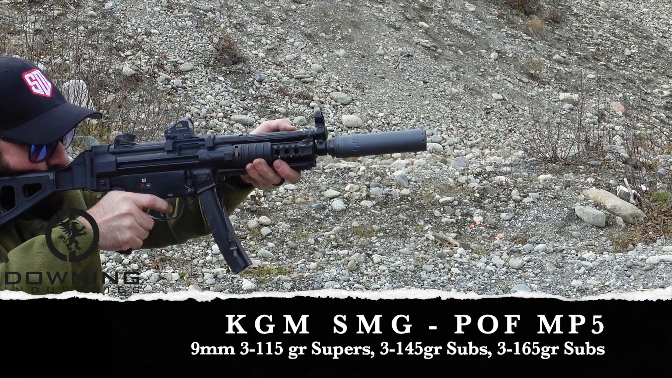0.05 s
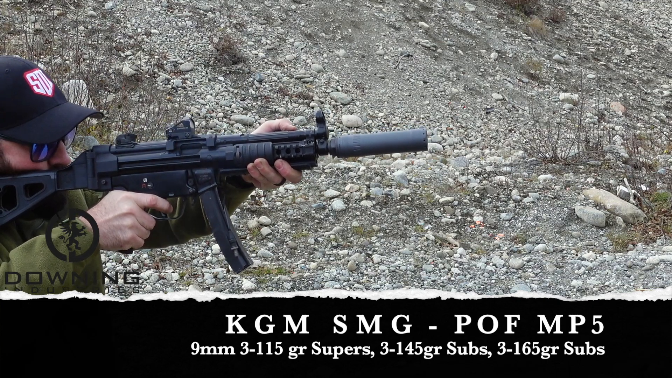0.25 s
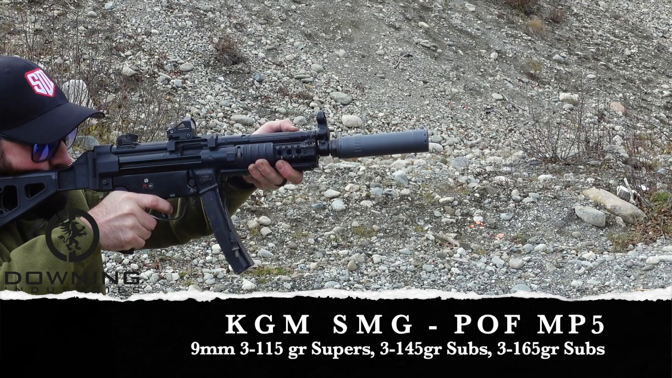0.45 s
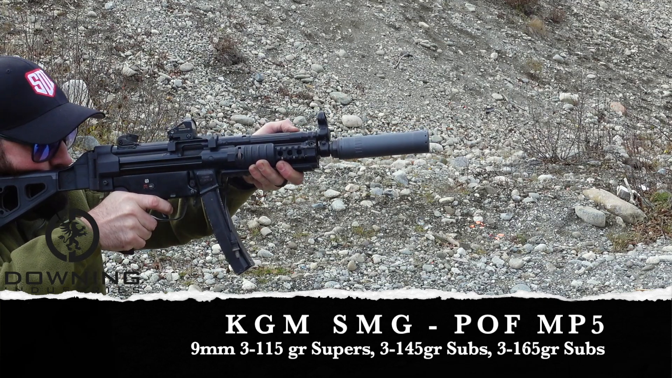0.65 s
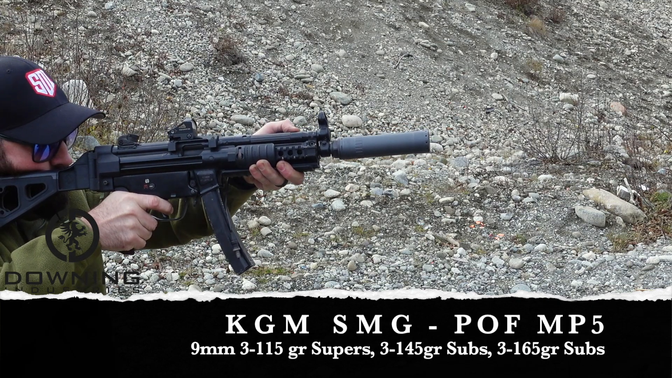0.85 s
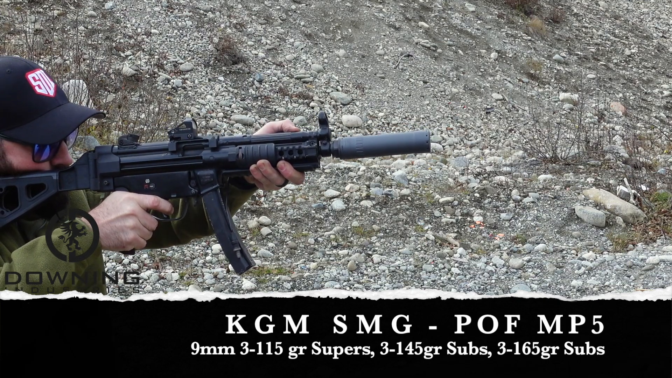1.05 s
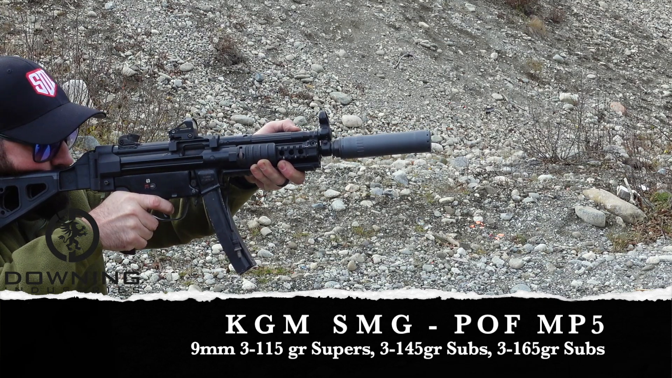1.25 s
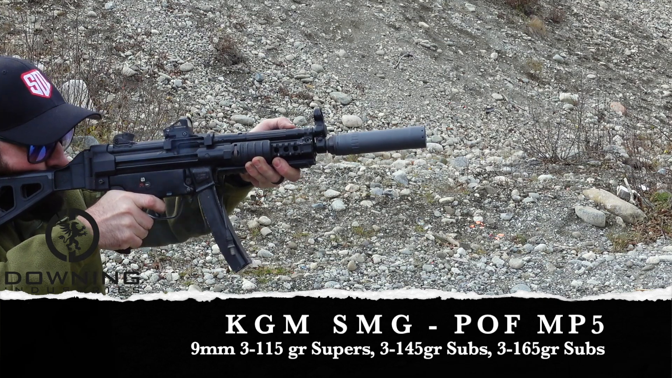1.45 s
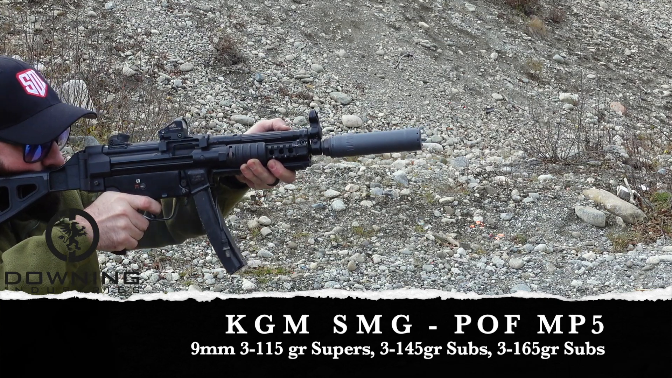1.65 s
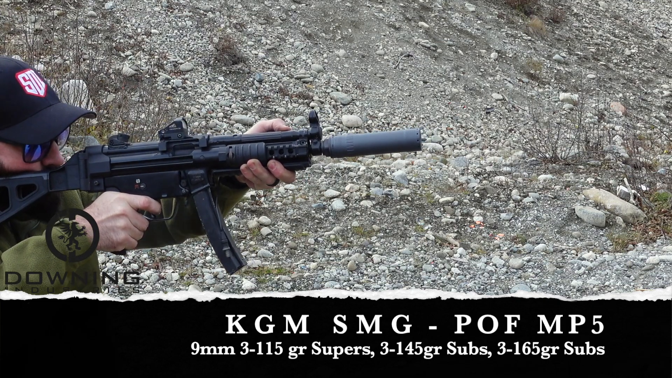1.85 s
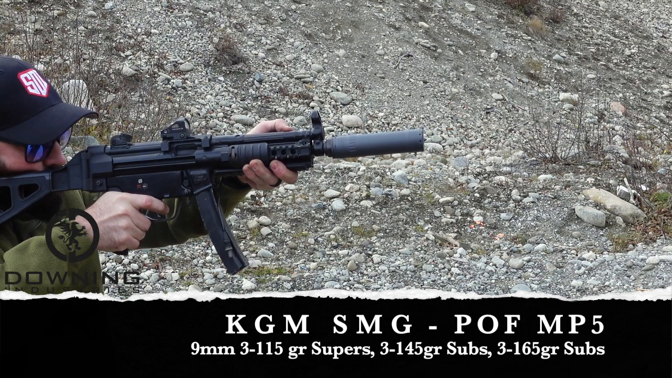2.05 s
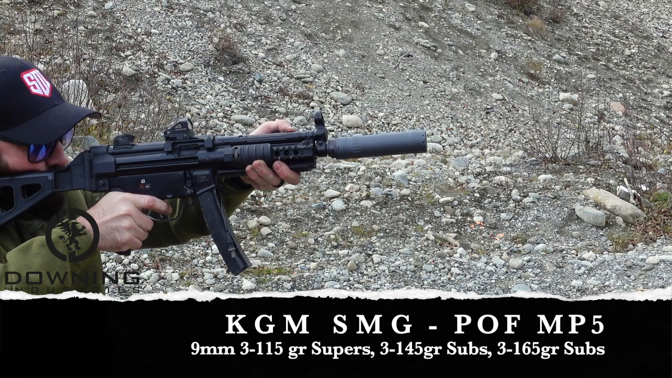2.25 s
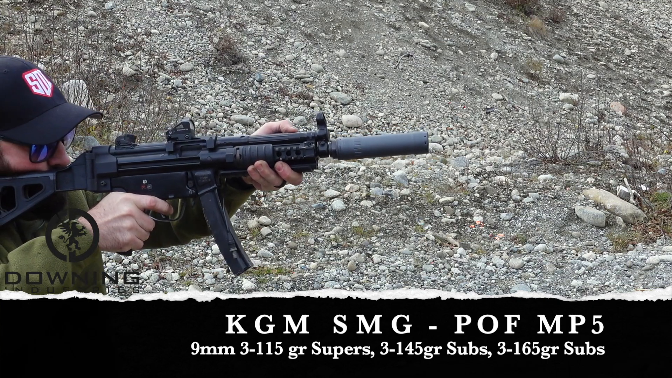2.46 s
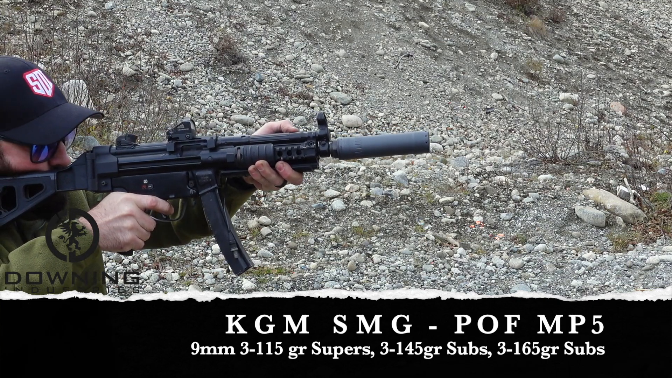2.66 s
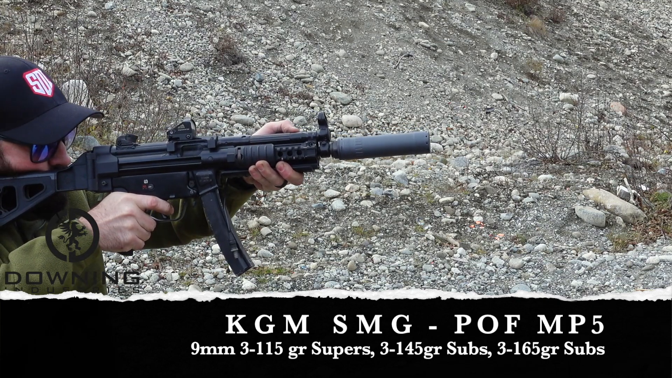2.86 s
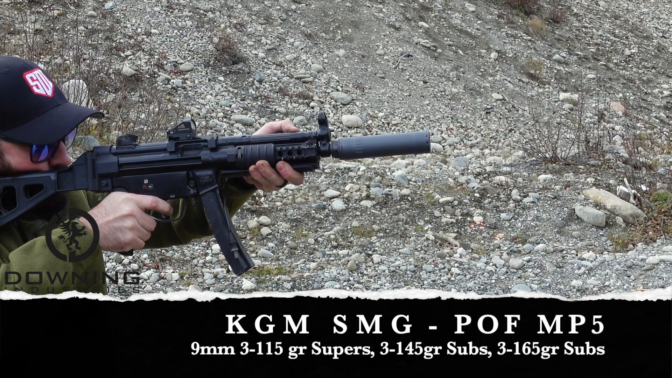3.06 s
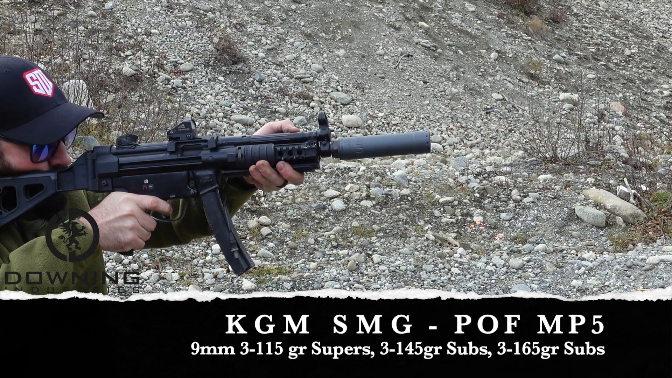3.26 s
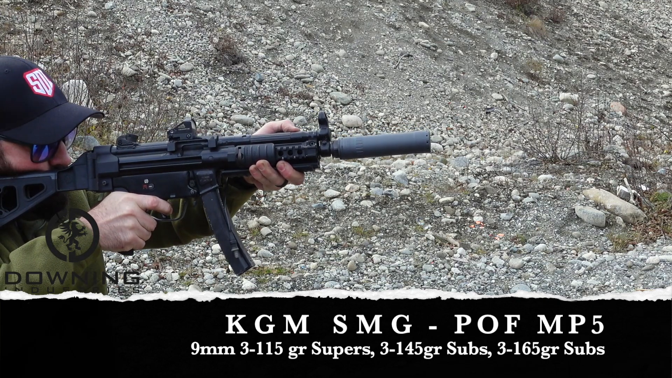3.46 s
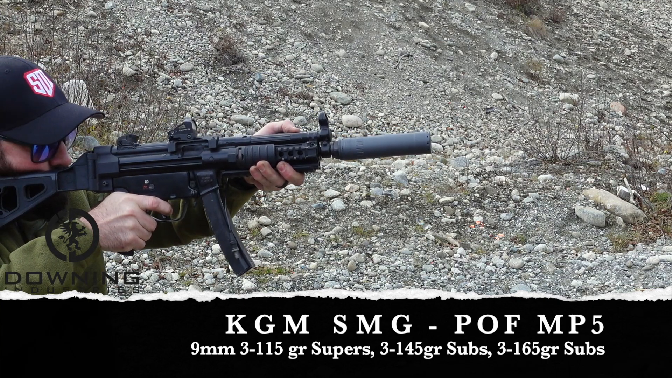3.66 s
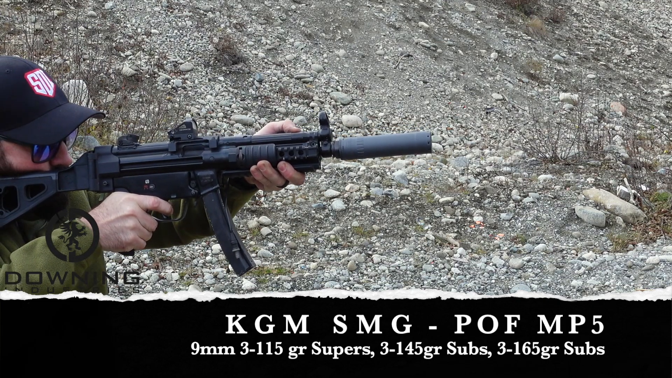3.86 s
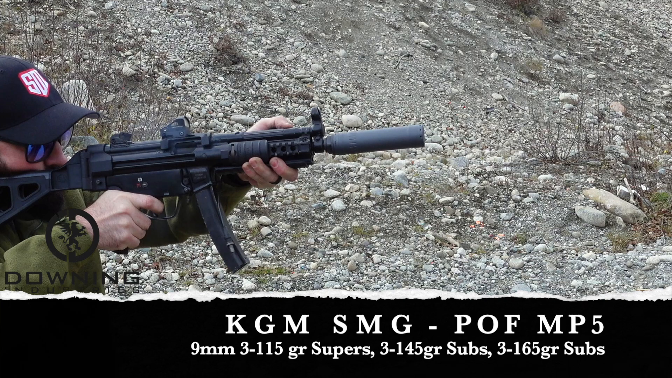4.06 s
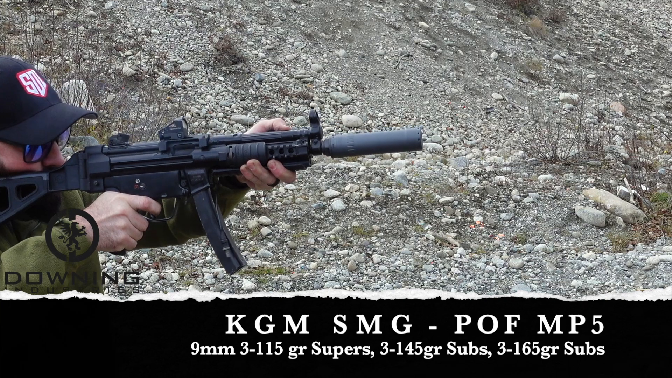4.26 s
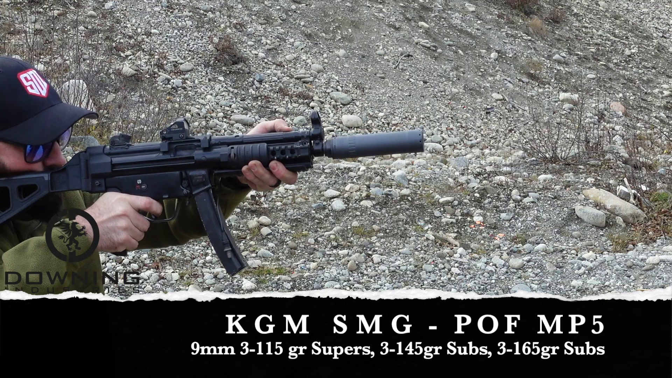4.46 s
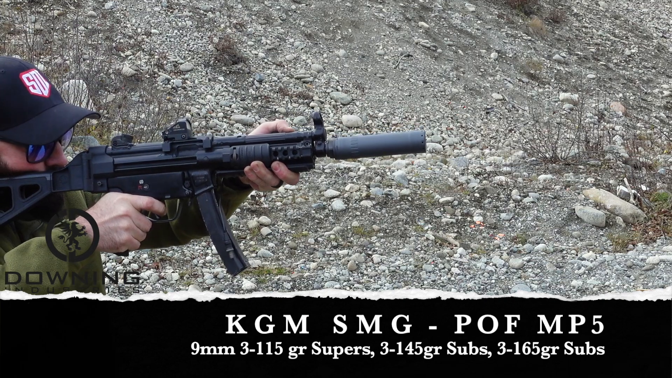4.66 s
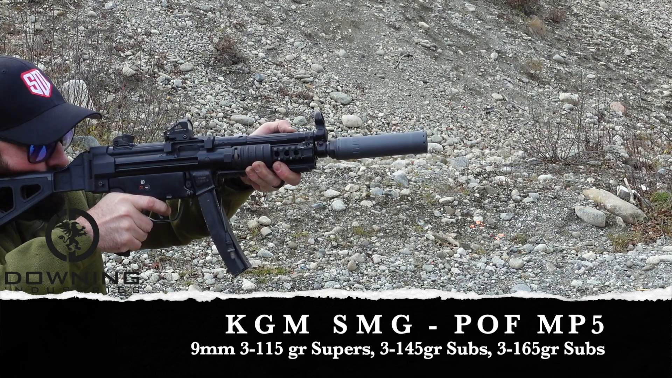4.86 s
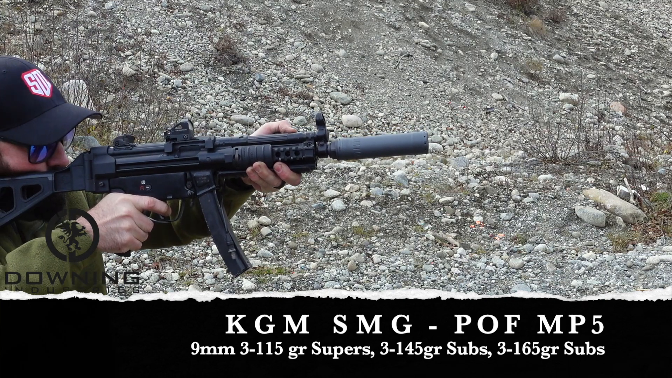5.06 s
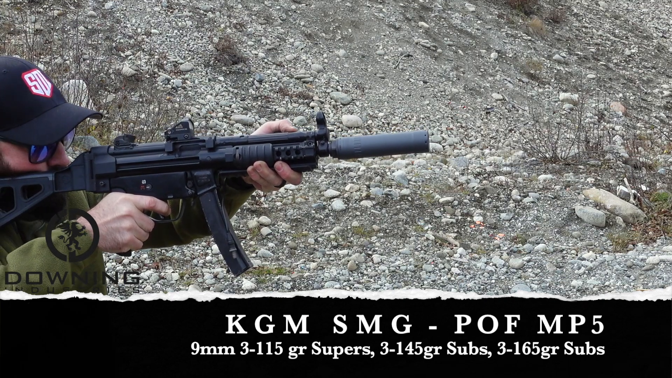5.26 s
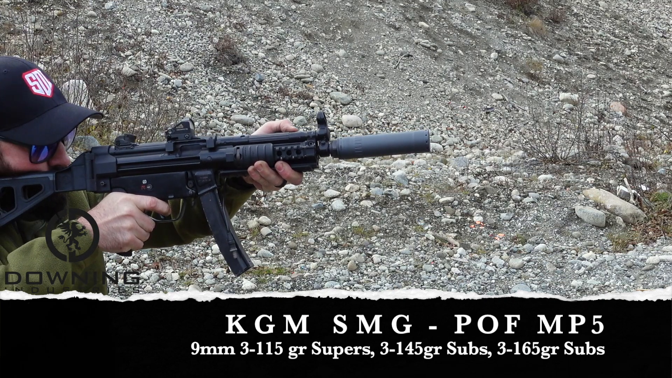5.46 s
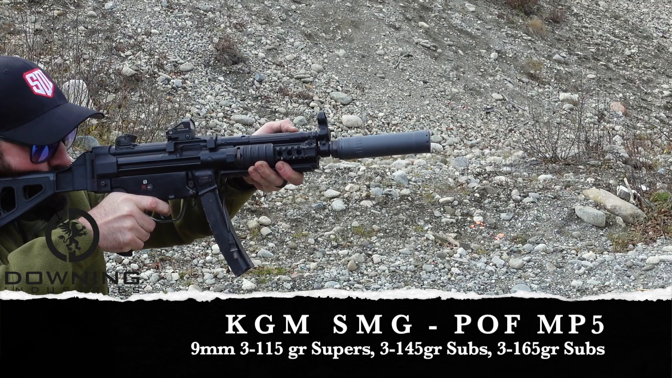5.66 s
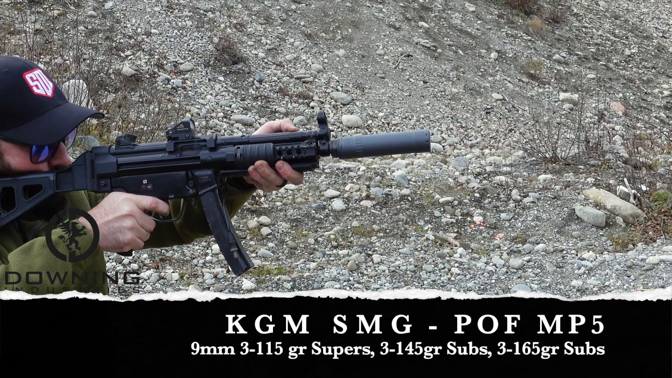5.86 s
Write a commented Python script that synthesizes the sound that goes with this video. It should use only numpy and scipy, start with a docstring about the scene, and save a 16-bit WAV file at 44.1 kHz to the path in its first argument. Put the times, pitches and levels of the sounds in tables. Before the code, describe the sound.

Two separate single shots from a suppressed gun heard close up in one channel. Each is a dry, punchy burst of gas with fast steel bolt slaps, then echoes off gravel slopes and a crisp trigger reset click. The first is brighter and longer, with hissing crack scatter and a strong thud from the bank; the second is drier. Soft breeze, tiny metal ticks and stock knocks fill the gaps.

```python
"""Suppressed carbine at a gravel range

Two single shots from a 9 mm carbine outdoors, heard from beside the gun, in steady air noise and breeze.
Each shot: hammer fall, gas jet and roar, pressure swing, venting, bolt contacts, thuds in the bank, echoes.
Supersonic cracks (one from before the opening, one with the first shot) add washes; gravel throws sprays.
Contacts and gas are shaped noise bursts, steel is ringing modes, echoes are noise in decaying bands.
The trigger resets with a click after each shot; blast and bolt overload the input and its limiter."""
import sys
import numpy as np
from scipy import signal
from scipy.fft import rfft, irfft
from scipy.io import wavfile

SR = 44100
rng = np.random.default_rng(int(sys.argv[2]) if len(sys.argv) > 2 else 0)


def waveform_to_disk(signal):
    """Save audio, clipped to [-1, 1], as 16-bit WAV at the path in sys.argv[1]."""
    frames = np.transpose(np.atleast_2d(signal))
    scaled = np.clip(frames, -1, 1) * 32767
    samples = np.round(scaled).astype(np.int16)
    wavfile.write(sys.argv[1], SR, samples)


N = 260631
TIME = np.arange(N) / SR


def from_db(db):
    """Decibels to amplitude gain."""
    return 10 ** (np.asarray(db) / 20)


def at_hz(points, hz):
    """Interpolate a spectrum linearly in dB along log frequency."""
    knots_hz, values = np.transpose(points)
    return np.interp(np.log(np.maximum(hz, 1)), np.log(knots_hz), values)


def colour(x, spectrum):
    """Minimum-phase filter with this relative spectrum; white noise keeps its power."""
    size = 8192
    hz = np.arange(size // 2 + 1) * SR / size
    gain = from_db(at_hz(spectrum, hz))
    unit_power_gain = gain / np.sqrt(np.mean(gain ** 2))
    # fold the cepstrum onto positive time: causal response
    cepstrum = irfft(np.log(unit_power_gain))
    cepstrum[1:size // 2] *= 2
    cepstrum[size // 2 + 1:] = 0
    impulse = irfft(np.exp(rfft(cepstrum)))
    return signal.oaconvolve(x, impulse)[:N]


def band_pass(x, low_hz, high_hz):
    """Butterworth band-pass, second order at each edge."""
    edges_hz = [low_hz, min(high_hz, .45 * SR)]
    sos = signal.butter(2, edges_hz, "band", fs=SR, output="sos")
    return signal.sosfilt(sos, x + 1e-18)


def bursts(rows, rise_s):
    """White noise that flares up and decays exponentially at each row (start_s, level_db, t60_s)."""
    power = np.zeros(N)
    for start_s, level_db, t60_s in rows:
        at = round(start_s * SR)
        age_s = TIME[:min(N - at, SR // 2)]
        decay = from_db(level_db - 60 * age_s / t60_s)
        rise = 1 - np.exp(-age_s / rise_s)
        power[at:at + len(age_s)] += (decay * rise) ** 2
    return np.sqrt(power) * rng.standard_normal(N)


def ring(force, hz, t60_s):
    """Two-pole resonator: a unit click starts a decaying sine of initial height 1."""
    radius = from_db(-60 / (t60_s * SR))
    step_rad = 2 * np.pi * hz / SR
    feedback = [1, -2 * radius * np.cos(step_rad), radius ** 2]
    return signal.lfilter([0, np.sin(step_rad)], feedback, force + 1e-18)


# distant outdoor noise, relative: pitch [Hz], level [dB per Hz]
AIR_SPECTRUM = [(12, -27.5), (20, 3), (58, -12.5), (130, -12.5), (241, -15.5), (293, -12), (590, -14),
                (780, -17), (1530, -20.5), (3250, -31), (5680, -36.5), (14300, -40), (16000, -42)]
# breeze gusts: peak [s], rise above calm [dB]
GUST_ROWS = [(2.58, 7.5), (2.95, 6), (3.55, 5), (5.72, 9)]
AIR_RMS_DB, CALM_RMS_DB = -63.5, -77.5
GUST_HALF_S = .14  # from peak to 1/e of the dB rise


def outdoor_air(flutter_db=1.55):
    """Steady coloured noise, plus low-frequency noise swelling as wind turbulence on the microphone."""
    knots_s = np.arange(0, 6.2, .12)
    flutter = np.interp(TIME, knots_s, rng.standard_normal(len(knots_s)))
    gust_db = sum(rise_db * np.exp(-((TIME - peak_s) / GUST_HALF_S) ** 2) for peak_s, rise_db in GUST_ROWS)
    wind_gain = from_db(CALM_RMS_DB + gust_db + flutter_db * flutter)
    wind = band_pass(rng.standard_normal(N), 30, 120)
    air = colour(rng.standard_normal(N), AIR_SPECTRUM)
    return from_db(AIR_RMS_DB) * air + wind_gain * wind / wind.std()


def returned_db(delay_s, reflectors):
    """Each stretch of terrain swells up to its own delay, then fades at a steady dB rate; powers sum."""
    power = 1e-18
    for arrives_s, swell_s, level_db, fade_db_per_s in reflectors:
        swell = np.exp(-(np.minimum(delay_s - arrives_s, 0) / swell_s) ** 2)
        fade = from_db(level_db - fade_db_per_s * np.maximum(delay_s - arrives_s, 0))
        power = power + (swell * fade) ** 2
    return 10 * np.log10(power)


# soft ground eats the lows, air the highs: pitch [Hz], loss [dB per s of travel]
LOSS_SPECTRUM = [(50, 39.5), (140, 53.5), (280, 44), (560, 20), (1100, 3), (2200, 12.5), (4000, 27),
                 (6300, 44), (8000, 55.5), (10000, 75), (12000, 93.5), (14000, 104)]


def echoes(sources, reflectors, spectrum, longest_s, grain_db):
    """Countless small reflections as band noise: later ones lose more lows and highs, up to a limit."""
    edges_hz = np.geomspace(35, 17000, 33)
    white = rng.standard_normal((2, N))
    # stronger and weaker reflectors by turns, a few ms apart
    grain_s = TIME[::128]
    grain = from_db(grain_db * np.interp(TIME, grain_s, rng.standard_normal(len(grain_s))))
    coarse_s = TIME[::32]
    out = np.zeros(N)
    for k, (low_hz, high_hz) in enumerate(zip(edges_hz, edges_hz[1:])):
        hz = np.sqrt(low_hz * high_hz)
        octaves = np.log2(high_hz / low_hz)
        power = 0
        for start_s, source_db in sources:
            delay_s = np.maximum(coarse_s - start_s, 0)
            travel_s = longest_s * np.tanh(delay_s / longest_s)  # saturates at longest_s
            loss_db = at_hz(LOSS_SPECTRUM, hz) * travel_s
            level_db = source_db + returned_db(delay_s, reflectors) + at_hz(spectrum, hz) - loss_db
            power = power + (coarse_s > start_s) * from_db(level_db) ** 2 * octaves
        sos = signal.butter(3, [low_hz, high_hz], "band", fs=SR, output="sos")
        band = signal.sosfilt(sos, white[k % 2] * grain)
        out += band / band.std() * np.interp(TIME, coarse_s, np.sqrt(power))
    return out


# supersonic bullets, the first before the opening: start [s], echo level [dB]
CRACK_ROWS = [(-.53, 1.5), (1.3862, -1)]
# crack echo colour: pitch [Hz], level [dB per octave]
CRACK_SPECTRUM = [(50, -30), (140, -18), (280, -3.5), (560, -1), (1100, 1), (1800, 6.5), (2500, 2.5),
                  (3600, 10), (4800, 6), (6300, 7.5), (10000, 4), (14000, 2.5)]
# nearby gravel, bank, hillside, far country:
# delay [s], swell [s], blast level [dB], blast fade [dB/s], crack level [dB], crack fade [dB/s]
TERRAIN_ROWS = [(.02, .013, -41.5, 44, -32.5, 70), (.15, 0.038, -44, 52, -31, 37),
                (.54, .22, -49, 55, -39, 61), (.95, 0.34, -85.5, 30, -59.5, 12.5)]


def crack_wash():
    """Terrain returns the supersonic cracks as a wash."""
    paths = [(delay_s, swell_s, crack_db, fade) for delay_s, swell_s, _, _, crack_db, fade in TERRAIN_ROWS]
    return echoes(CRACK_ROWS, paths, CRACK_SPECTRUM, longest_s=1.2, grain_db=1.5)


# brass and gear ticks: start [s], level before boost [dB], t60 [s], nominal pitch [Hz]
TICK_ROWS = [(.504, -56, 0.032, 11000), (1.4762, -15, .009, 4500), (3.617, -63, 0.03, 3800),
             (4.1022, -22, 0.011, 9500), (4.1048, -26, .01, 9500), (4.11, -32, .05, 8500),
             (5.125, -66, .04, 4500), (5.217, -59, 0.093, 4210)]
# soft knocks on the stock: start [s], level [dB], t60 [s]
KNOCK_ROWS = [(2.559, -48.5, 0.038), (5.264, -43, 0.025)]
# stock knock colour, relative: pitch [Hz], level [dB per Hz]
KNOCK_SPECTRUM = [(150, -15), (350, -4), (500, -1), (650, -5), (1000, -24), (3000, -42)]


def handling(tick_boost_db=5.0):
    """Brass and gear tick as narrow noise bursts; the stock knocks softly."""
    ticks = np.zeros(N)
    for start_s, level_db, t60_s, pitch_hz in TICK_ROWS:
        tick = bursts([(start_s, level_db, t60_s)], rise_s=0.00027)
        ticks += band_pass(tick, 0.69 * pitch_hz, 1.2 * pitch_hz)
    knocks = colour(bursts(KNOCK_ROWS, rise_s=0.00038), KNOCK_SPECTRUM)
    return from_db(tick_boost_db) * ticks + knocks


# shots: start [s], gas jet [dB], pressure swing [dB], venting [dB],
# bolt locks again [s], feeding [dB], locking blow [dB]
SHOT_ROWS = [(1.386, 10, 4.5, -17.5, 1.4468, -4, 2.5), (3.9623, 9, 6, -18, 4.0152, -1.5, -1)]
# sear release, hammer fall: lead before blast [s], level [dB], t60 [s], dull knock re level [dB]
HAMMER_ROWS = [(.0245, -58, .02, -4), (.0091, -9.5, .014, -7)]
# rear stop, scrape off the magazine: share of cycle [1], level [dB], t60 [s], dull knock re level [dB]
BOLT_ROWS = [(.41, -17.5, .018, 3), (.62, -23.5, .11, 1.5)]
# round leaves magazine, hits ramp, seats:
# lead before locking [s], level re feeding [dB], t60 [s], dull knock re level [dB]
CHAMBERING_ROWS = [(.0103, -10, 0.021, -7), (.0086, -2.5, .017, -11.5), (.0052, 0, 0.02, -11.5)]
LOCK_T60_S, LOCK_KNOCK_DB = .016, -16


def bolt_cycle():
    """Contacts of each shot at the pace of its own cycle: rows (start_s, level_db, t60_s, knock_db)."""
    rows = []
    for fired_s, _, _, _, locked_s, feed_db, lock_db in SHOT_ROWS:
        cycle_s = locked_s - fired_s
        rows += [(fired_s - lead_s, *blow) for lead_s, *blow in HAMMER_ROWS]
        rows += [(fired_s + share * cycle_s, *blow) for share, *blow in BOLT_ROWS]
        for lead_s, level_db, t60_s, knock_db in CHAMBERING_ROWS:
            rows.append((locked_s - lead_s, feed_db + level_db, t60_s, knock_db))
        rows.append((locked_s, lock_db, LOCK_T60_S, LOCK_KNOCK_DB))
    return rows


# receiver modes before the band-pass: pitch [Hz], level [dB], t60 [s]
RECEIVER_MODES = [(796, 0, .035), (1200, -6, .03), (1432, -11, .1), (2293, -21, .16), (2595, -23, .17),
                  (3924, -17, .08), (4565, -26, .17), (6002, -22, .07), (8926, -27, .09), (10240, -21, .07)]


def receiver(force):
    """Contact force rings the steel receiver's modes; it is too small to radiate bass."""
    modes = sum(from_db(level_db) * ring(force, hz, t60_s) for hz, level_db, t60_s in RECEIVER_MODES)
    return band_pass(modes, 890, 16000)


# steel contact colour, relative: pitch [Hz], level [dB per Hz]
STEEL_SPECTRUM = [(88, -52.5), (150, -24), (448, -19), (759, -9.5), (1980, -9.5), (2220, -5.5), (3920, 0),
                  (5250, -6), (7180, -3.5), (13700, -11.5), (16000, -18.5)]
# colour of whole-gun knocks and of venting, relative: pitch [Hz], level [dB per Hz]
VENT_SPECTRUM = [(29, -49.5), (50, -18.5), (398, -10), (765, -3), (1330, -4), (1910, -2.5), (2270, -8),
                 (4450, -10.5), (5150, -12.5), (5950, -12), (14900, -21.5), (16000, -29.5)]


def action(ring_db=-42):
    """Steel parts slam and grate as noise, knock the whole gun and ring the receiver."""
    contacts = bolt_cycle()
    force = bursts([(s, db, t60_s) for s, db, t60_s, _ in contacts], rise_s=0.00018)
    knock = bursts([(s, db + knock_db, t60_s) for s, db, t60_s, knock_db in contacts], rise_s=.0003)
    return colour(force, STEEL_SPECTRUM) + colour(knock, VENT_SPECTRUM) + from_db(ring_db) * receiver(force)


# gas jet colour, relative: pitch [Hz], level [dB per Hz]
JET_SPECTRUM = [(120, -31.5), (200, -7), (1270, -10), (1590, -7.5), (3490, -5), (4120, -14.5), (5940, -1),
                (7010, -8), (12200, -17), (16000, -20)]
# gas roar colour, relative: pitch [Hz], level [dB per Hz]
ROAR_SPECTRUM = [(60, -23), (200, -13.5), (330, -10.5), (520, 2), (850, -6), (1250, -3), (2500, -7.5),
                 (6000, -15.5), (15000, -30)]
# pressure swing returned by slopes: delay [s], level before band-pass [dB]
SLOPE_ROWS = [(.178, -43), (0.354, -43.5), (.385, -52)]


def muzzle(jet_t60_s=.02, roar_t60_s=0.031, roar_db=-5, vent_t60_s=0.2, swing_hz=118, swing_t60_s=0.02):
    """A hard gas jet dulls into a roar, one heavy pressure swing, then gas vents from the breech."""
    push = np.zeros(N)
    for start_s, _, swing_db, *_ in SHOT_ROWS:
        push[round(start_s * SR)] = from_db(swing_db)
    swing = ring(push, swing_hz, swing_t60_s)
    jet_rows = [(s, jet_db, jet_t60_s) for s, jet_db, *_ in SHOT_ROWS]
    roar_rows = [(s, jet_db + roar_db, roar_t60_s) for s, jet_db, *_ in SHOT_ROWS]
    vent_rows = [(s, vent_db, vent_t60_s) for s, _, _, vent_db, *_ in SHOT_ROWS]
    jet = colour(bursts(jet_rows, rise_s=0.000067), JET_SPECTRUM)
    roar = colour(bursts(roar_rows, rise_s=0.00068), ROAR_SPECTRUM)
    vent = colour(bursts(vent_rows, rise_s=0.0034), VENT_SPECTRUM)
    # only bass comes back from the rough slopes in one piece
    returns = sum(from_db(db) * np.interp(TIME - delay_s, TIME, swing) for delay_s, db in SLOPE_ROWS)
    return jet + roar + swing + vent + band_pass(returns, 53, 80)


# blast echo colour off slopes and scrub: pitch [Hz], level [dB per octave]
BLAST_SPECTRUM = [(50, -14.5), (140, -9.5), (280, -1.5), (560, -1.5), (1100, -0.5), (2200, 5.5),
                  (3000, 8.5), (3700, 4), (4800, 10), (6300, 6.5), (10000, 6.5), (14000, 2)]


def blast_wash():
    """Terrain returns the muzzle blasts as a wash."""
    sources = [(start_s, 0) for start_s, *_ in SHOT_ROWS]
    paths = [(delay_s, swell_s, blast_db, fade) for delay_s, swell_s, blast_db, fade, _, _ in TERRAIN_ROWS]
    return echoes(sources, paths, BLAST_SPECTRUM, longest_s=0.95, grain_db=1.7)


# crack glancing off gravel patches: start [s], level [dB], t60 [s]
SPRAY_ROWS = [(1.477, -23, 0.15), (1.496, -26.5, 0.16), (1.513, -21.5, 0.11)]
# spray colour, relative: pitch [Hz], level [dB per Hz]
SPRAY_SPECTRUM = [(300, -19), (1500, -12.5), (2800, -2.5), (3800, 1.5), (5200, -5), (8000, -11),
                  (11000, -10.5), (16000, -26)]


def gravel_sprays():
    """The crack scatters off gravel under the bullet's path as bright noise bursts."""
    return colour(bursts(SPRAY_ROWS, rise_s=0.0026), SPRAY_SPECTRUM)


# thuds from the gravel bank: start [s], level [dB], t60 [s]
THUD_ROWS = [(1.5565, -17, 0.042), (1.567, -11.5, 0.031), (4.127, -32, 0.1), (4.138, -24, 0.027)]
# thud colour, relative: pitch [Hz], level [dB per Hz]
GRAVEL_SPECTRUM = [(40, -27), (130, -10), (250, -17.5), (480, 6.5), (800, -5.5), (1300, -1.5),
                   (2200, -14.5), (5000, -15), (14000, -46)]


def bank_thuds():
    """Dull thuds come back from the gravel bank as short noise bursts."""
    return colour(bursts(THUD_ROWS, rise_s=0.00066), GRAVEL_SPECTRUM)


# trigger resets: start [s], snap [dB], rebound [dB]
RESET_ROWS = [(1.9929, -7.5, -20.5), (4.715, -10, -16.5)]
SLIP_LEAD_S, SLIP_DB, SLIP_T60_S = 0.0045, -28, 0.014
SNAP_T60_S, REBOUND_LAG_S, REBOUND_T60_S = .014, .005, 0.021


def reset_contacts():
    """Each reset is a sear slip, a snap and a rebound: rows (start_s, level_db, t60_s)."""
    rows = []
    for snap_s, snap_db, rebound_db in RESET_ROWS:
        rows.append((snap_s - SLIP_LEAD_S, SLIP_DB, SLIP_T60_S))
        rows.append((snap_s, snap_db, SNAP_T60_S))
        rows.append((snap_s + REBOUND_LAG_S, rebound_db, REBOUND_T60_S))
    return rows


# sear contact colour, relative: pitch [Hz], level [dB per Hz]
SEAR_SPECTRUM = [(150, -56), (350, -39), (600, -11.5), (800, -8.5), (1000, -16), (1400, -7.5),
                 (2000, -19.5), (2600, -10.5), (3200, -15.5), (4300, -8.5), (5200, -14), (6300, -17.5),
                 (8500, -20.5), (10500, -20), (16000, -31)]


def trigger(ring_db=-36, scatter_db=-30, scatter_t60_s=0.09):
    """The sear snaps back in three quick contacts; nearby stones scatter a little of it."""
    contacts = reset_contacts()
    force = bursts(contacts, rise_s=0.00067)
    scatter = bursts([(s, db + scatter_db, scatter_t60_s) for s, db, _ in contacts], rise_s=0.0019)
    return colour(force + scatter, SEAR_SPECTRUM) + from_db(ring_db) * receiver(force)


def scene():
    """Outdoor air, the gun close by, gravel and bank downrange, and echoes, in one channel."""
    gun = handling() + action() + muzzle() + trigger()
    downrange = gravel_sprays() + bank_thuds()
    washes = crack_wash() + blast_wash()
    return (outdoor_air() + gun + downrange + washes)[None]


def record(dry, ceiling=1.0, limiter_s=0.0033, squeeze=0.88, low_cut_hz=22, cutoff_hz=15900):
    """The input soft-clips, a fast limiter pulls the gain down, and both ends of the band are cut."""
    clipped = dry / (1 + (dry / ceiling) ** 6) ** (1 / 6)
    keep = np.exp(-1 / (limiter_s * SR))
    load = signal.lfilter([1 - keep], [1, -keep], clipped ** 2)
    limited = clipped / (1 + squeeze * load)
    # no steady pressure passes
    high_pass = signal.butter(1, low_cut_hz, "high", fs=SR, output="sos")
    low_pass = signal.ellip(10, .1, 90, cutoff_hz, fs=SR, output="sos")
    return signal.sosfilt(low_pass, signal.sosfilt(high_pass, limited))


dry = scene()
out = record(dry)
waveform_to_disk(out)
```